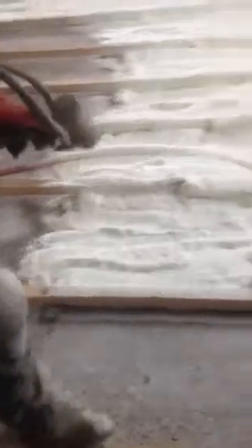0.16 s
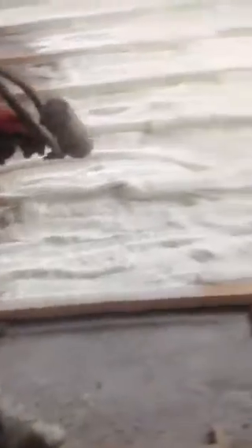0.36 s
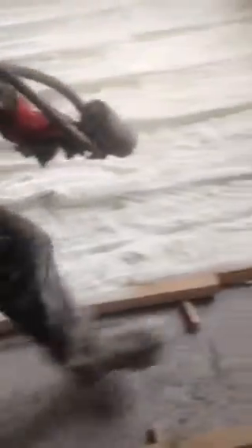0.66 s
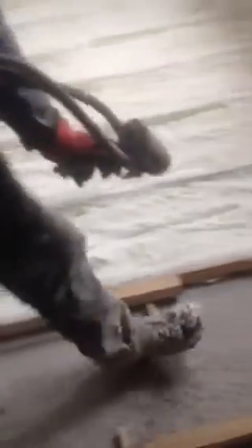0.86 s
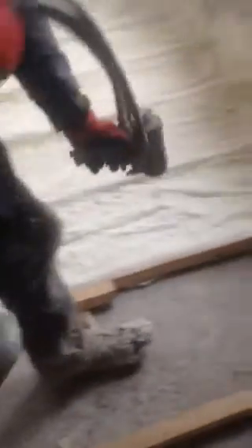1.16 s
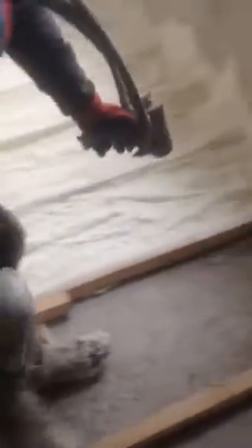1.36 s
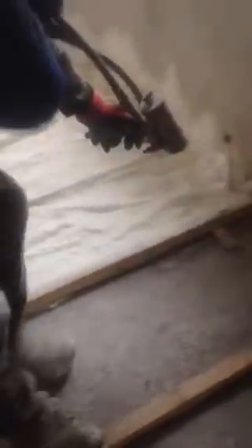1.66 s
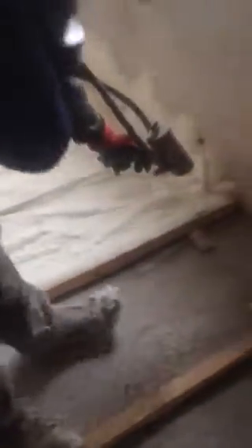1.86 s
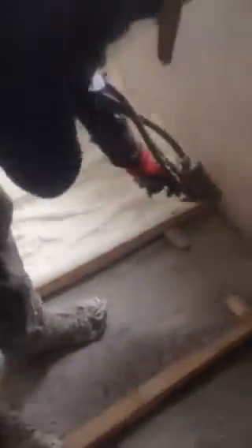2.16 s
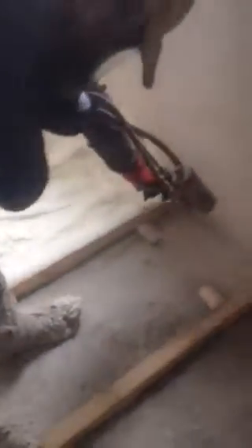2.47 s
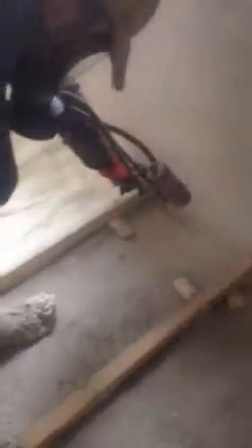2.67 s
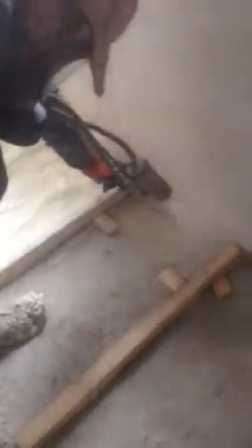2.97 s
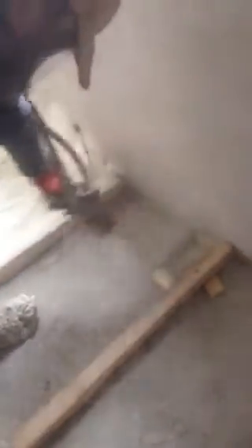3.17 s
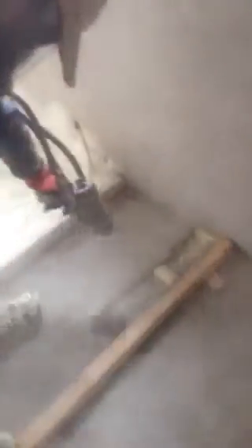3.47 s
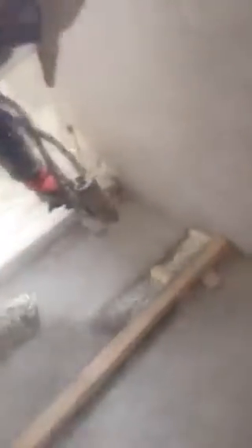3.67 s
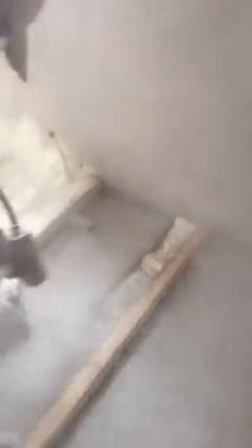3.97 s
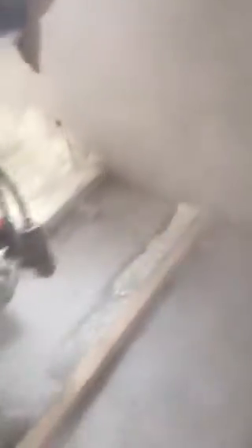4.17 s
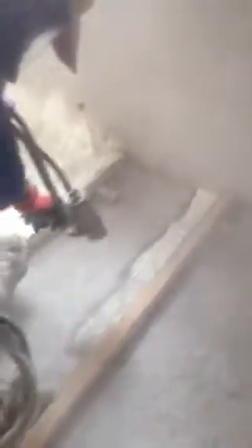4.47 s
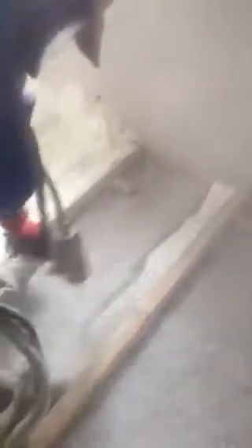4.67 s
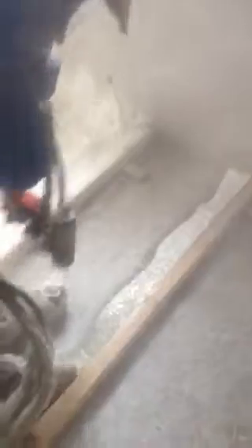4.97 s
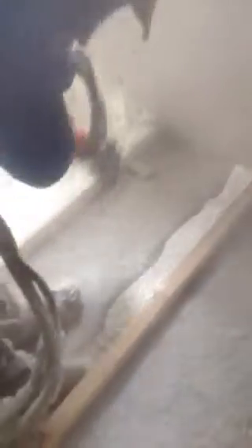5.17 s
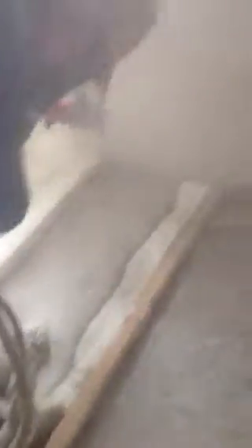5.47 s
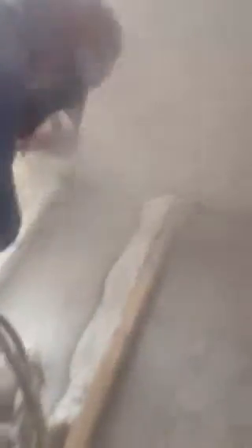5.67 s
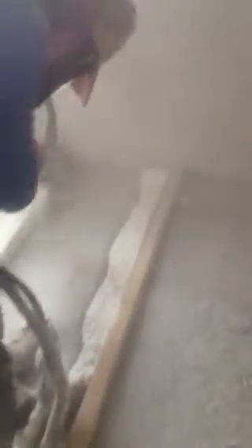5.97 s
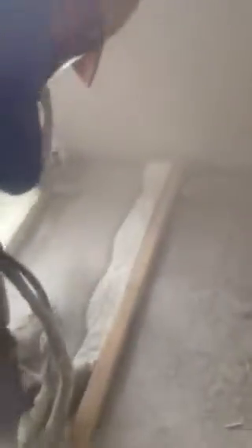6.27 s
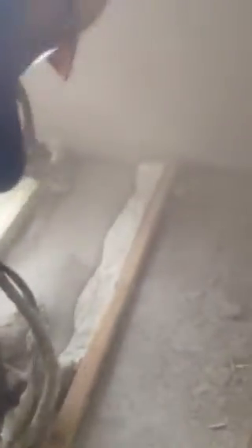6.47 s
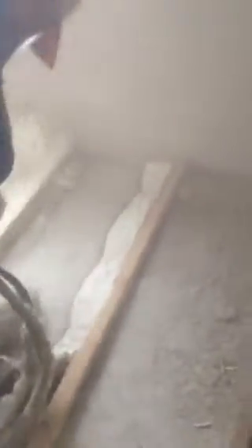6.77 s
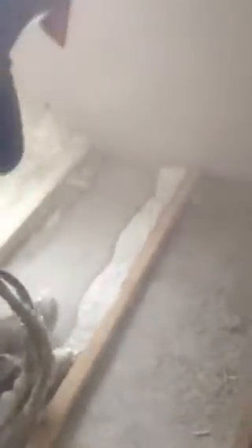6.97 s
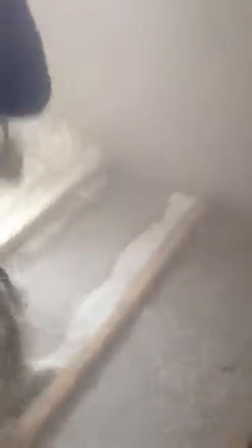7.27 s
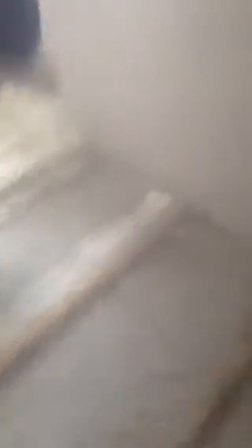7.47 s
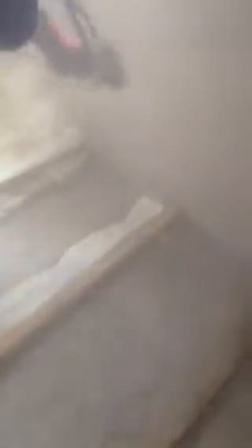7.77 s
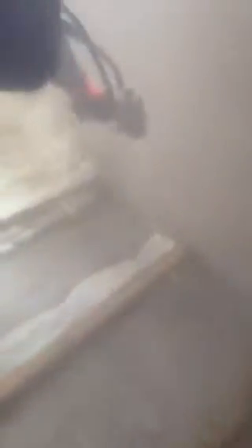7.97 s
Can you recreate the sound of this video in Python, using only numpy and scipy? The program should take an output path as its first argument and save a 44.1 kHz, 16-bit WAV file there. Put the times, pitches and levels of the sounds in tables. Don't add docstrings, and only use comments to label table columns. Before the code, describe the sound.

Pressurised foam sprays onto a floor between bare walls, heard very near: a continuous harsh hiss with spattering drops and an uneven feed. Low hose thumps and hollow roars come now and then above a weak distant motor drone. In the second half short pauses drop the hiss to a soft air leak, each ending abruptly. Finally the nozzle faces the microphone, sharper and brighter, then shuts off once more.

```python
import sys
import numpy as np
from scipy import signal
from scipy.fft import rfft, irfft
from scipy.io import wavfile
from scipy.ndimage import uniform_filter1d, minimum_filter1d

SR = 44100
rng = np.random.default_rng(int(sys.argv[2]) if len(sys.argv) > 2 else 0)


def store_wav(level_fs):
    pcm = np.round(np.clip(np.atleast_2d(level_fs), -1, 1) * 32767)
    wavfile.write(sys.argv[1], SR, pcm.T.astype(np.int16))


def makeup_ratio(level_db):
    decades = np.asarray(level_db, float) / 20
    return 10 ** decades


N = 357640

# [f/Hz, level/dB per Hz]
PUMP_RUMBLE = [(15, 5), (35, 5), (60, -4), (100, -14.5), (150, -0.5), (195, 3.5), (260, -7.5), (340, -13),
               (570, -60)]
# [f/Hz, waver/Hz, level/dB]
PUMP_LINES = [(186, 1.2, -63), (203, 1.2, -61), (216.6, 1.0, -61), (301.5, 1.0, -58)]
# [t/s, length/s, level/dB]
PUMP_LOADS = [(.88, 0.65, -54), (1.5, 0.65, -63), (2.28, .4, -53), (2.95, .27, -57), (3.25, 0.13, -51),
              (3.498, .3, -55), (4.0, 0.42, -60), (4.55, 0.11, -57), (4.76, 0.47, -52), (5.417, 0.48, -59),
              (5.97, 0.2, -59), (6.4, .35, -62), (6.77, 0.39, -53), (7.5, 0.13, -59), (7.85, .5, -57)]
# [f/Hz, width/Hz, level/dB]
HOSE_LOW = [(257.6, 133, -1.5), (343, 147, -3.5), (452, 132, -4)]
# [f/Hz, width/Hz, level/dB]
HOSE_HIGH = [(600, 260, -1), (900, 350, -1), (1400, 550, 0), (2200, 900, -2)]
# [t/s, rise/s, hold/s, low level/dB, high level/dB]
SURGES = [(0.822, .06, .1, -41, -45), (1.852, .02, 0.081, -45, -49), (2.994, .1, 0.21, -43, -40),
          (3.728, 0.084, 0.31, -45, -43), (4.67, 0.12, 0.15, -39, -40), (4.775, 0.014, 0.17, -48, -41.5),
          (5.79, .05, 0.13, -44, -40.5), (5.92, 0.078, 0.13, -42.5, -37.5), (6.62, .03, .15, -44.5, -38),
          (6.77, 0.073, .17, -42.5, -41), (8.03, 0.034, 0.18, -45, -41)]
# [t/s, low level/dB, high level/dB, t60/s]
KNOCKS = [
    (.845, -44.5, -48, .5),
    (1.86, -39, -44, 0.27),
    (4.777, -50, -30, 0.55),
    (6.625, -48, -44.5, 0.82),
    (8.04, -46, -35.5, .8),
]
# [t/s, length/s, f/Hz, width/Hz, level/dB]
RINGS = [
    (.85, .05, 826, 40, -45),
    (2.282, 0.22, 960, 7, -48),
    (3.021, 0.159, 366, 10, -45),
    (3.081, .36, 239.7, 8.6, -47.5),
    (3.801, 0.28, 258.5, 7.7, -49),
    (4.774, .19, 606, 170, -38.5),
    (6.628, 0.064, 1390, 180, -45),
    (6.823, .12, 354, 26, -44),
]
# [f/Hz, level/dB per Hz]
NOZZLE = [(410, -56), (700, -19), (1000, -16.5), (1400, -15.5), (2500, -10), (3600, -7), (4600, -4),
          (5150, -6), (5800, -2.5), (6800, -0.5), (8500, -1), (10700, -3.5), (13000, -3), (15100, -2)]
# [t/s, core level/dB, extra fizz/dB as the nozzle turns to the microphone]
AIM = [(0.0, -25, 2), (0.2, -25, -2.5), (0.4, -25.5, -1.5), (0.9, -24.5, -0.5), (1.1, -22.5, -1.5),
       (2.1, -22.5, -2.5), (2.8, -23, -2), (3.3, -23, -3), (3.75, -22, -2), (4.1, -25.5, 1),
       (4.55, -24.5, 0.5), (4.9, -27, 0.5), (5.5, -27.5, 1.5), (6.55, -27.5, 1), (7.17, -28.5, -0.5),
       (7.42, -26.5, 4), (7.8, -27, 4), (8.11, -25, 0)]
# [t/s, sag/s, end/s, how far shut 0-1]
PAUSES = [
    (2.975, .2, 3.21, 1),
    (3.78, .2, 4.005, 1),
    (4.595, .17, 4.77, .95),
    (5.78, .15, 6.055, 1),
    (6.585, .15, 6.88, 1),
    (8.015, .09, 8.3, 1),
]
REOPEN_S = [.09, .05, .022]
# [t/s, length/s, level/dB, tone -1 dull to 1 bright]
SPURTS = [(0.117, .08, -1, .1), (0.37, 0.12, 1.5, .5), (.6, 0.36, 1, -0.33), (1.04, 0.1, 2, .6),
          (1.09, .05, 0, 0.042), (1.202, 0.048, 0.5, 0.0097), (1.866, .06, 1.5, -.1), (2.1, .06, 1, -.1),
          (2.19, .05, 0.5, -.1), (2.632, 0.037, -1, .1), (2.92, 0.046, 1, .3), (3.28, 0.044, -3, 0.43),
          (3.732, 0.052, 1, 0.56), (4.073, 0.034, -5, .3), (4.098, 0.096, 3.5, -0.71),
          (4.21, .1, -0.5, -.4), (4.307, .06, 1, -.1), (4.45, 0.18, 1, -0.8), (4.574, 0.036, 0, 0.62),
          (4.793, 0.042, 1, .1), (4.97, 0.13, -1.5, -0.78), (5.363, .04, 0, 0.22), (5.763, 0.097, 2, .2),
          (6.09, 0.076, 2, -0.25), (6.56, 0.079, 2, .2), (6.953, .1, 3, -0.85), (7.18, 0.12, -2, -1.1),
          (7.586, 0.072, 1, -0.052), (7.988, .05, 1, .3), (8.077, 0.066, 3, -0.48)]
# [t/s, f/Hz]
WHISTLE = [(0.0, 7800), (.75, 7300), (1.06, 7900), (1.2, 7200), (1.72, 7700), (2.1, 6760), (2.26, 7560),
           (3.09, 6900), (3.95, 7150), (4.2, 7720), (4.75, 7400), (5.0, 8100), (5.53, 7900), (5.98, 7200),
           (6.45, 7700), (6.73, 7200), (7.45, 8150), (8.11, 7400)]
# [t/s, lower edge f/Hz, ..]
SIDE_STRIPS = [(.076, 6200), (.122, 5600, 8300), (.169, 5100, 10600), (.238, 4200), (.517, 8900, 13000),
               (.819, 5700, 10300), (1.469, 6200), (1.771, 4800, 13700), (2.003, 4600, 6800), (2.05, 8200),
               (2.63, 6900, 13000), (2.677, 11300), (2.932, 6800), (2.955, 4600), (3.327, 12400),
               (3.42, 4100), (4.673, 5900), (5.161, 5100), (5.231, 11000), (5.37, 6300, 9300),
               (5.858, 5100), (6.74, 9600, 11600), (6.879, 4600), (7.112, 8200), (7.413, 7500),
               (7.553, 5900, 13000), (7.808, 11000), (7.994, 4600)]

RUMBLE_DB, STARTUP_DB, IDLE_DB = -48.5, -2.5, -66
FLOW_LOW_DB, FLOW_HIGH_DB = -50, -46.5
FLOW_FOLLOWS, GURGLE_DB = 0.91, -0.28
EBB_LOW_S, EBB_HIGH_S = 1.85, 0.7
FAN_DB, FAN_FOLLOWS, FAN_TURNS = -30.5, 0.53, 0.32
PURGE_CORE_DB, PURGE_FAN_DB, PURGE_FIZZ_DB = -29.5, -32.5, -32.5
SNAP_S, SNAP_SHARE = 0.012, 0.38
LOW_CUT_HZ, EDGE_HZ = 120, 15285
STRIP_SHARE, STRIP_HZ = 0.24, 1550


def evened(x):
    return x / np.sqrt(np.mean(x ** 2) + 1e-20)


def read(points, hz):
    f, value = np.transpose(points)
    return np.interp(np.log(hz + 1), np.log(f + 1), value)


def follow(rows, t):
    s, *columns = np.transpose(rows)
    return [np.interp(t, s, c) for c in columns]


def ramp(t, start, length):
    return np.clip((t - start) / max(length, 1e-3), 0, 1)


def add(mix, start, sound):
    mix[start:start + len(sound)] += sound


def wander(t, slow_hz, fast_hz):
    hz = np.geomspace(slow_hz, fast_hz, 30)
    coarse = np.linspace(0, t[-1], 3000)
    sines = np.sin(2 * np.pi * (np.outer(coarse, hz) + rng.random(30)))
    return np.interp(t, coarse, evened(sines @ hz ** -.5))


def resonate(x, hz, width):
    turn = np.exp(2j * np.pi * hz * np.arange(len(x)) / SR)
    r = np.exp(-np.pi * width / SR)
    smooth = signal.lfilter([(1 - r) ** 2], [1, -2 * r, r * r], x / turn)
    return 2 * (turn * smooth).real


def ring(modes):
    return evened(sum(makeup_ratio(db) * evened(resonate(rng.standard_normal(N), hz, width)) for hz, width, db in modes))


def pump_load(t):
    swells = sum(makeup_ratio(db) * np.sin(np.pi * ramp(t, s, length)) ** 0.66 for s, length, db in PUMP_LOADS)
    return makeup_ratio(IDLE_DB) + swells


def pump():
    t = np.arange(N) / SR
    shape = makeup_ratio(read(PUMP_RUMBLE, np.fft.rfftfreq(N, 1 / SR)))
    rumble = evened(irfft(rfft(rng.standard_normal(N)) * shape, N))
    rumble_db = RUMBLE_DB + STARTUP_DB * (1 - ramp(t, 0.98, .1)) + 0.82 * wander(t, 0.606, 15)
    out = makeup_ratio(rumble_db) * rumble
    drone = np.sqrt(2) * np.sin(2 * np.pi * np.cumsum(124 + 4.1 * wander(t, 1.5, 20)) / SR)
    out += pump_load(t) * makeup_ratio(1.4 * wander(t, 4, 30)) * drone
    for hz, waver, db in PUMP_LINES:
        level = makeup_ratio(db + 2 + 2.3 * wander(t, 0.503, 6))
        out += level * np.sin(2 * np.pi * np.cumsum(hz + waver * wander(t, .5, 8)) / SR)
    return out


def flow(t):
    jet_db = FLOW_FOLLOWS * (follow(AIM, t)[0] + 25)
    low, high = makeup_ratio(FLOW_LOW_DB + 0.44 * jet_db), makeup_ratio(FLOW_HIGH_DB + jet_db)
    for s, rise, hold, low_db, high_db in SURGES:
        after = np.maximum(t - s - rise - hold, 0)
        low = np.hypot(low, ramp(t, s, rise) * makeup_ratio(low_db - 60 * after / EBB_LOW_S))
        high = np.hypot(high, ramp(t, s, rise) * makeup_ratio(high_db - 60 * after / EBB_HIGH_S))
    return low * makeup_ratio(GURGLE_DB * wander(t, 3, 25)), high * makeup_ratio(GURGLE_DB * wander(t, 3, 25))


def hose():
    t = np.arange(N) / SR
    low, high = flow(t)
    for s, low_db, high_db, t60 in KNOCKS:
        knock = (t > s) * makeup_ratio(-60 * np.maximum(t - s, 0) / t60)
        low = np.hypot(low, makeup_ratio(low_db) * knock)
        high = np.hypot(high, makeup_ratio(high_db) * knock)
    out = low * ring(HOSE_LOW) + high * ring(HOSE_HIGH)
    for s, length, hz, width, db in RINGS:
        mode = resonate(rng.standard_normal(SR // 2), hz, width)[-round(length * SR):]
        add(out, round(s * SR), makeup_ratio(db) * evened(mode) * signal.windows.tukey(len(mode), .2))
    return out


def closing(t, start, sag):
    return SNAP_SHARE * ramp(t, start, SNAP_S) + (1 - SNAP_SHARE) * ramp(t, start, sag)


def trigger(t):
    core_db, turn_db = follow(AIM, t)
    fan_db = FAN_DB + FAN_FOLLOWS * (core_db + 24.5) - FAN_TURNS * turn_db
    levels = np.array([core_db, fan_db, core_db + turn_db])
    shut = np.array([sum(far * (closing(t, s, sag) - ramp(t, end, back)) for s, sag, end, far in PAUSES)
                     for back in REOPEN_S])
    purge = np.array([[PURGE_CORE_DB], [PURGE_FAN_DB], [PURGE_FIZZ_DB]])
    levels += shut * (purge - levels)
    for s, length, db, tone in SPURTS:
        spurt_db = db * np.exp(-(2 * (t - s) / length) ** 2)
        levels += np.outer([1 - abs(tone), 1 - tone, 1 + tone], spurt_db)
    return levels


def jet():
    drops = makeup_ratio(3.0 * np.minimum(rng.exponential(1, N), 4)) * (rng.random(N) < 900 / SR)
    spray = rng.standard_normal(N) + 0.13 * evened(drops * rng.choice([-1., 1.], N))
    hz, t, z = signal.stft(spray, SR, nperseg=512, noverlap=384)
    core_db, fan_db, fizz_db = trigger(t)
    shape = makeup_ratio(read(NOZZLE, hz))
    core_band = (hz > 5600) & (hz < 9500)
    shape /= np.sqrt(np.sum(shape[core_band] ** 2) / len(hz))
    fan = np.clip(read([(4600, 0.7), (6000, 0)], hz), 0, 1)[:, None]
    fizz = np.clip(read([(8300, 0), (10500, 0.74)], hz), 0, 1)[:, None]
    db = (1 - fan - fizz) * core_db + fan * (fan_db + 6.5) + fizz * (fizz_db + 0.2)
    db += 0.34 * wander(t, 12, 60)
    near_whistle = np.exp(-((hz[:, None] - follow(WHISTLE, t)[0]) / 710.0) ** 2)
    db += (0.9 + 0.1 * (core_db + 23.5)) * near_whistle
    patches = rng.standard_normal((len(t), len(hz))).T
    patches = uniform_filter1d(uniform_filter1d(patches, 12, 0), 22, 1)
    db += 0.91 * evened(patches)
    return signal.istft(z * shape[:, None] * makeup_ratio(db), SR, nperseg=512, noverlap=384)[1][:N]


def room(x):
    hz, t, z = signal.stft(x, SR, nperseg=2048, noverlap=1536)
    echoes = rng.standard_normal((len(t), len(hz), 2)).T
    echoes = evened(uniform_filter1d(uniform_filter1d(echoes, 3, 1), 9, 2))
    ripple = abs(1 + 0.23 * (echoes[0] + 1j * echoes[1]))
    return signal.istft(z * evened(ripple), SR, nperseg=2048, noverlap=1536)[1][:N]


def scene():
    return np.tile(room(pump() + hose() + jet()), (2, 1))


def thin_treble(x):
    hz, t, z = signal.stft(x, SR, nperseg=2048, noverlap=1536)
    power = uniform_filter1d(abs(z) ** 2, 3, 1)
    under = uniform_filter1d(power, 5, 0) / (uniform_filter1d(power, 60, 0) + 1e-20)
    least_db = read([(3000, -30), (5000, -8), (9000, -6.6), (14000, -4.9)], hz)
    keep = 1. * (under > makeup_ratio(2 * least_db)[:, None])
    keep = minimum_filter1d(minimum_filter1d(keep, 3, 0), 3, 1)
    return signal.istft(z * keep, SR, nperseg=2048, noverlap=1536)[1][:N]


def side_strips(mono):
    frame = 2048
    side, hz = np.zeros(N + frame), np.fft.rfftfreq(frame, 1 / SR)
    for s, *edges in SIDE_STRIPS:
        start = round(s * SR) - frame // 2
        spectrum = abs(rfft(mono[start:start + frame], frame))
        for lo_hz in edges:
            band = (hz > lo_hz) & (hz < lo_hz + min(STRIP_SHARE * lo_hz, STRIP_HZ))
            strip = irfft(spectrum[band].mean() * band * np.exp(2j * np.pi * rng.random(len(hz))))
            add(side, start, strip * signal.windows.hann(frame))
    return side[:N]


def band_limit(x):
    return signal.sosfilt(signal.butter(12, 16645, fs=SR, output="sos"), x)


def record(dry):
    bass_cut = signal.butter(3, LOW_CUT_HZ, "high", fs=SR, output="sos")
    mono = thin_treble(signal.sosfilt(bass_cut, dry[0]))
    both = mono + np.outer([1, -1], side_strips(mono))
    edge = signal.firwin(2047, EDGE_HZ, window=("kaiser", 10), fs=SR)
    mix = signal.oaconvolve(both, edge[None], "same")
    return band_limit(mix)


dry = scene()
out = record(dry)
store_wav(out)
```